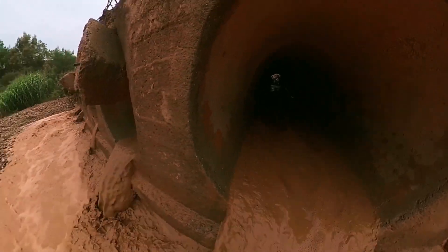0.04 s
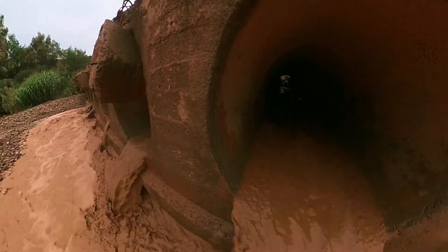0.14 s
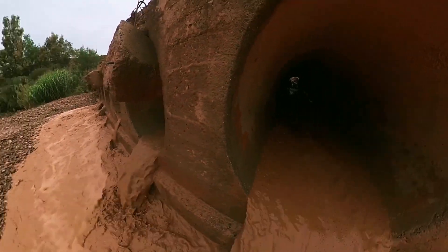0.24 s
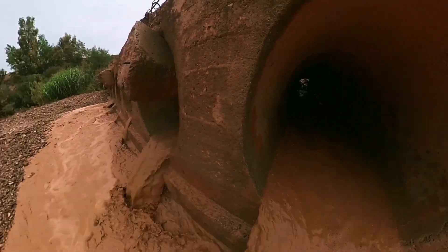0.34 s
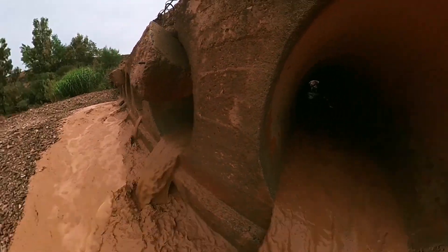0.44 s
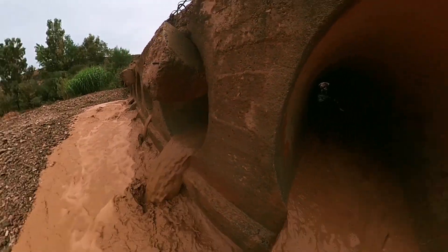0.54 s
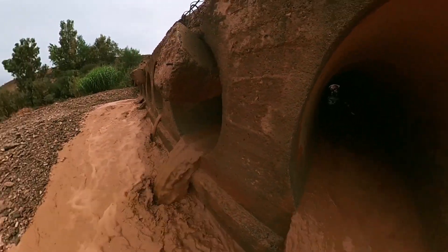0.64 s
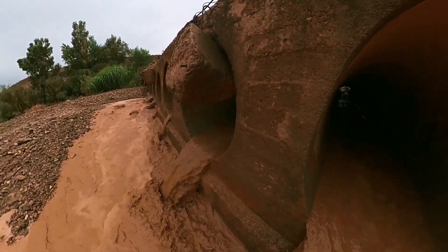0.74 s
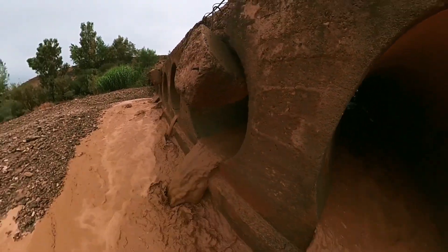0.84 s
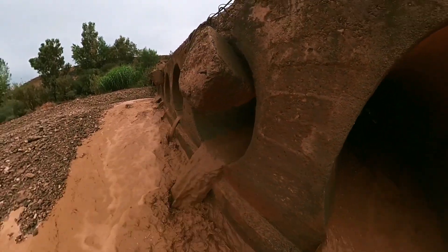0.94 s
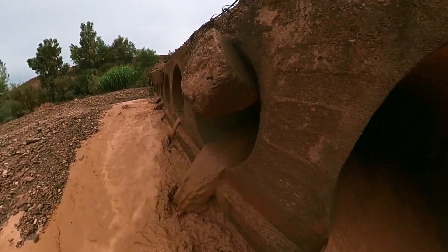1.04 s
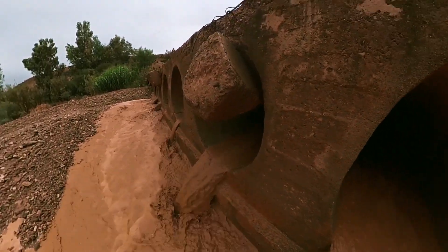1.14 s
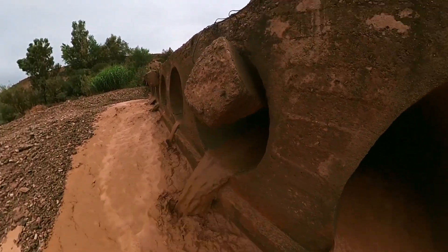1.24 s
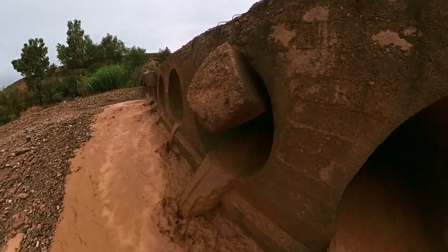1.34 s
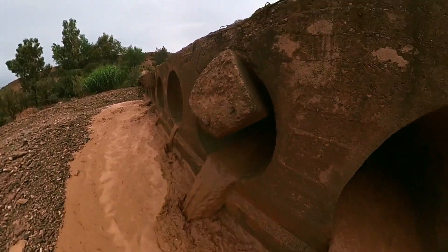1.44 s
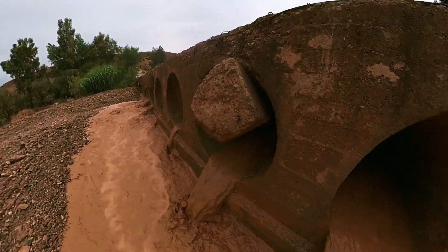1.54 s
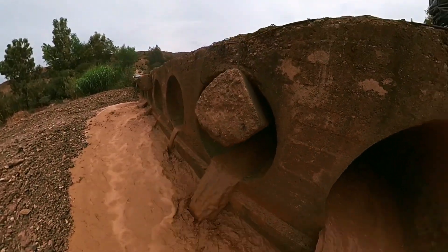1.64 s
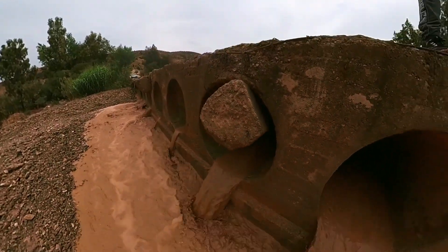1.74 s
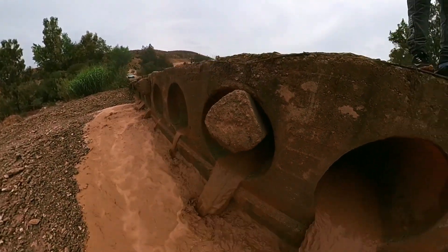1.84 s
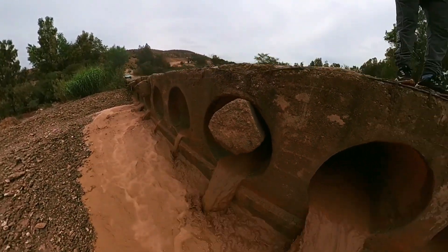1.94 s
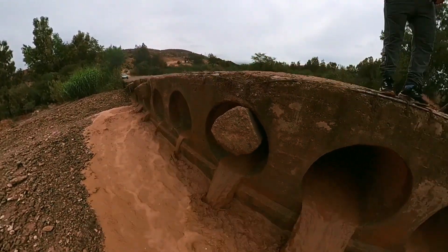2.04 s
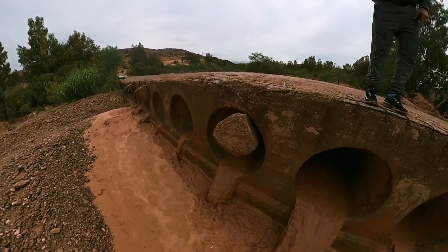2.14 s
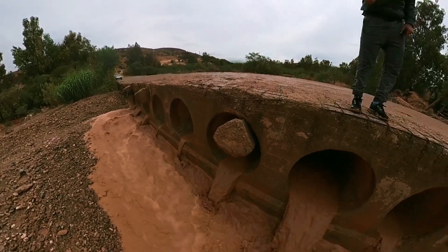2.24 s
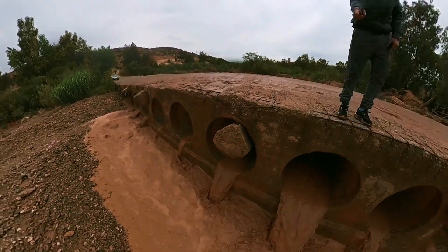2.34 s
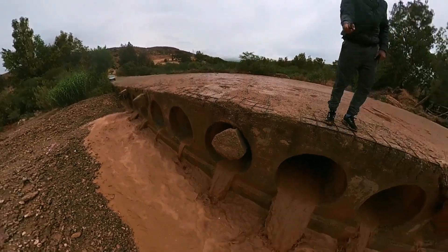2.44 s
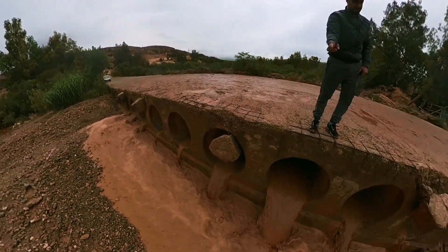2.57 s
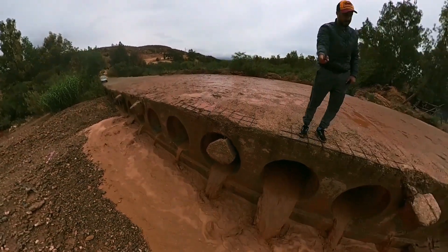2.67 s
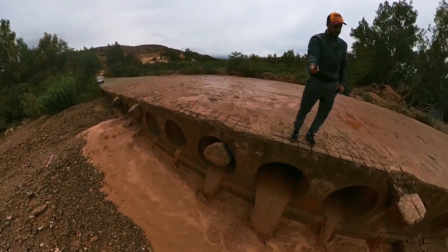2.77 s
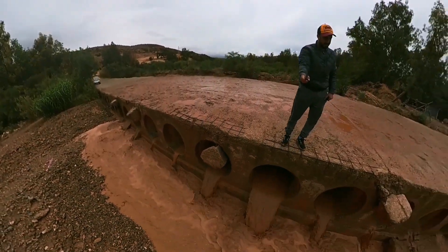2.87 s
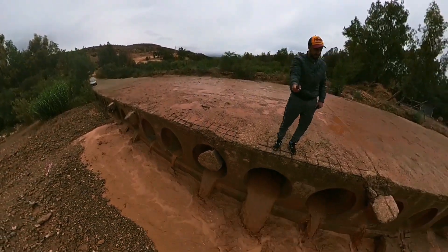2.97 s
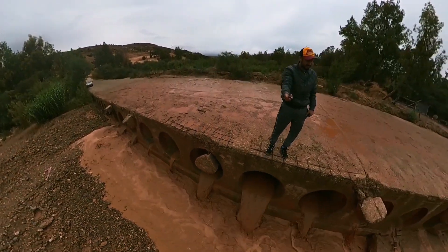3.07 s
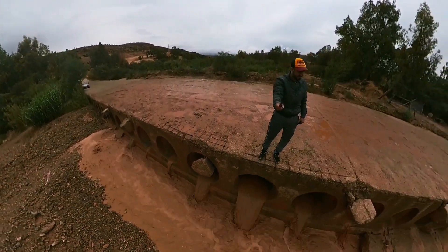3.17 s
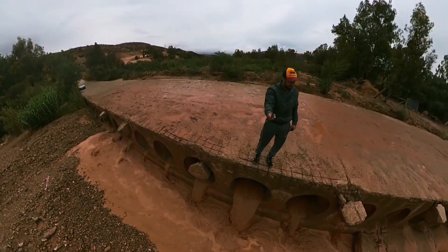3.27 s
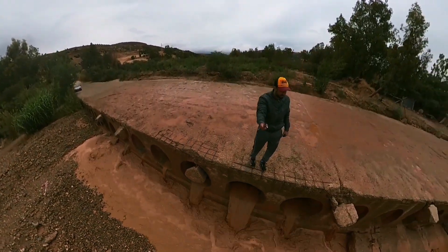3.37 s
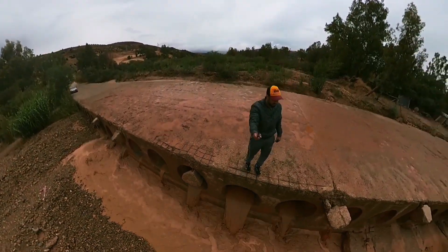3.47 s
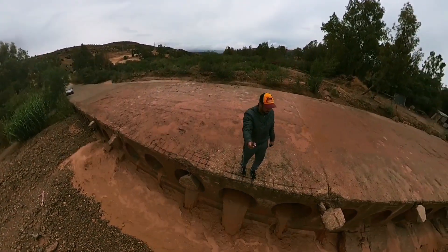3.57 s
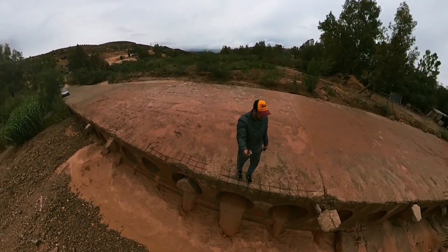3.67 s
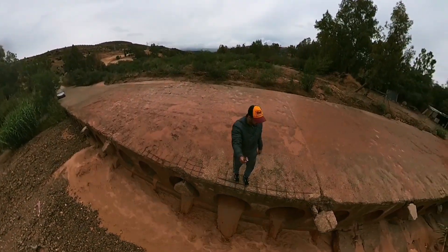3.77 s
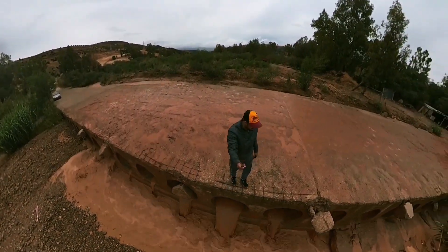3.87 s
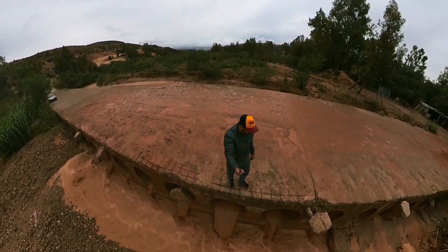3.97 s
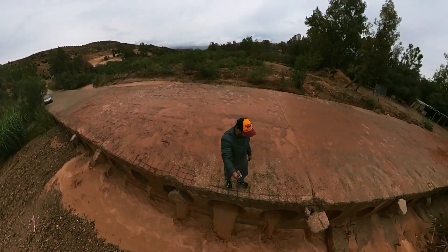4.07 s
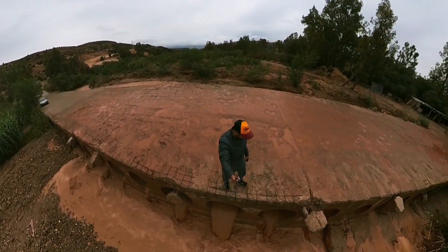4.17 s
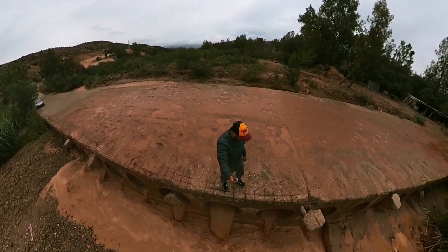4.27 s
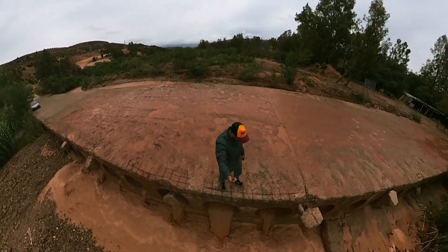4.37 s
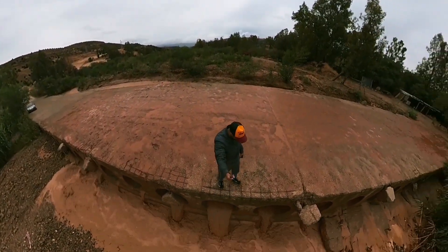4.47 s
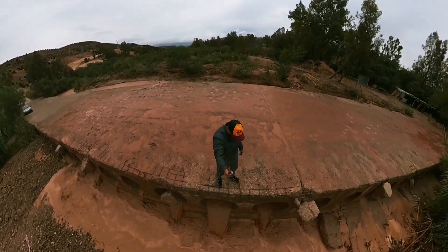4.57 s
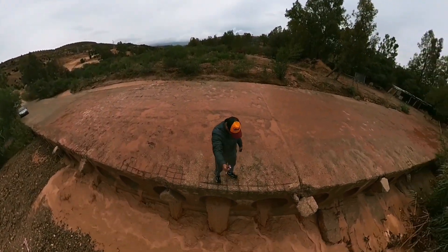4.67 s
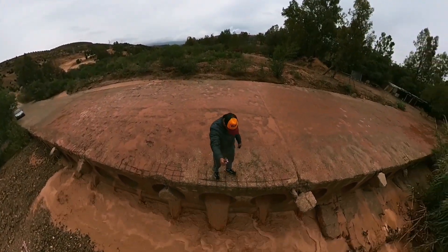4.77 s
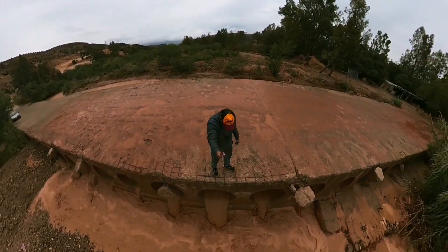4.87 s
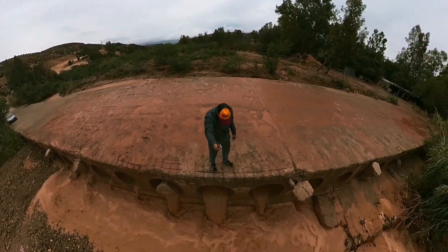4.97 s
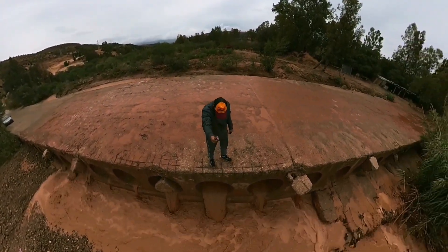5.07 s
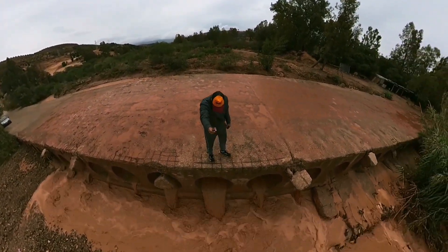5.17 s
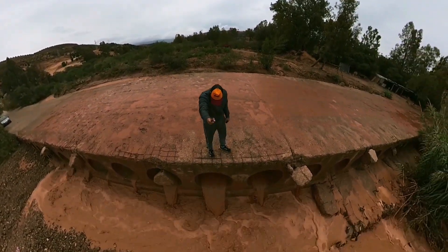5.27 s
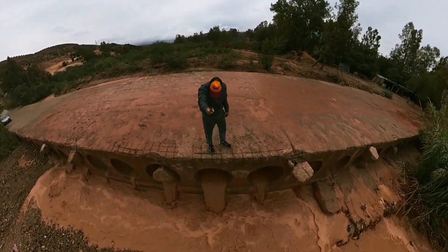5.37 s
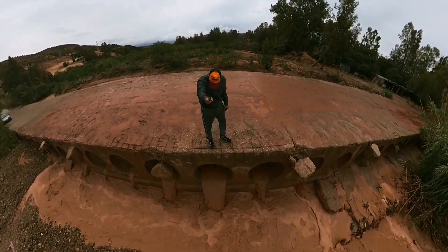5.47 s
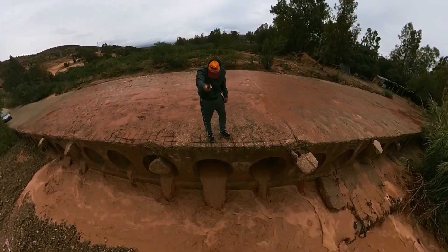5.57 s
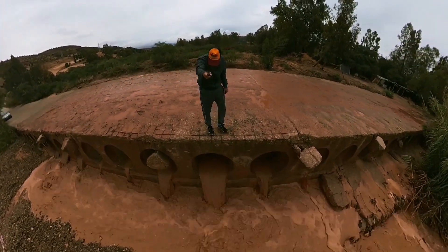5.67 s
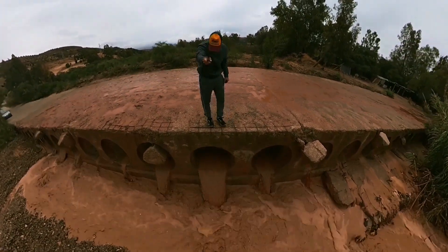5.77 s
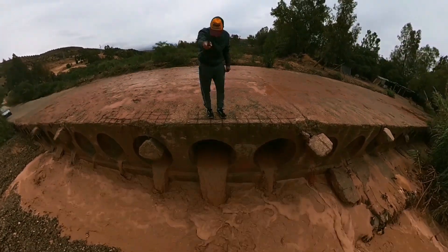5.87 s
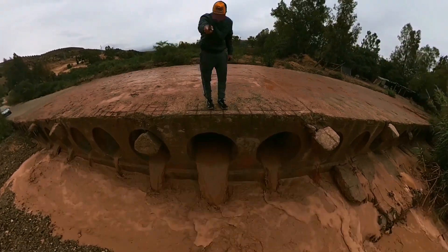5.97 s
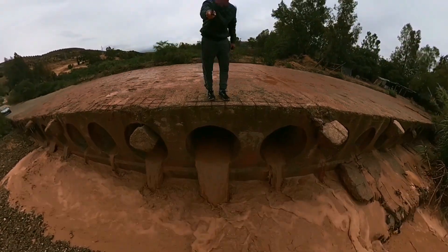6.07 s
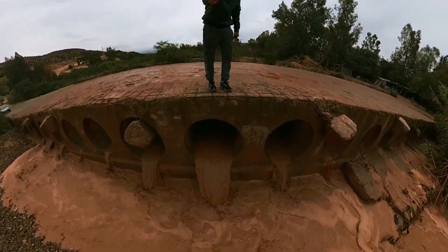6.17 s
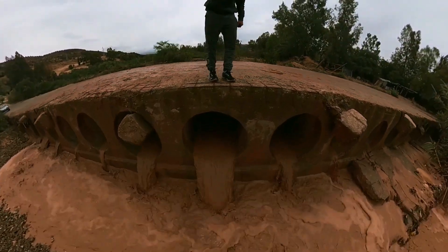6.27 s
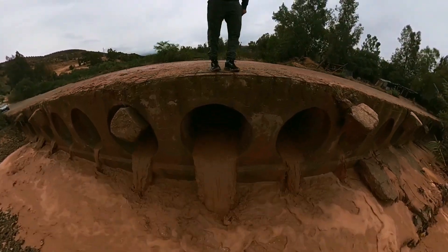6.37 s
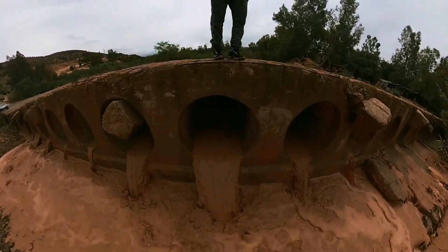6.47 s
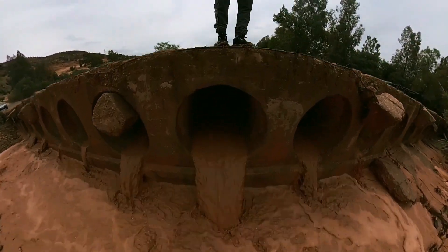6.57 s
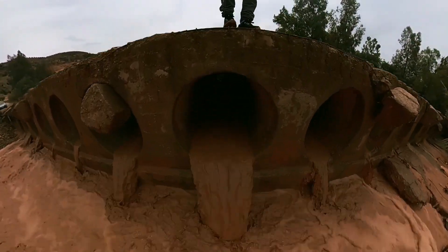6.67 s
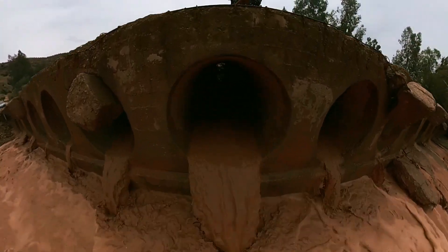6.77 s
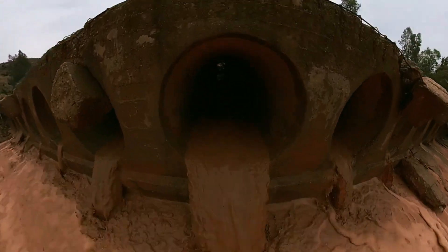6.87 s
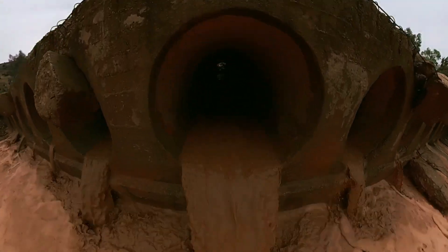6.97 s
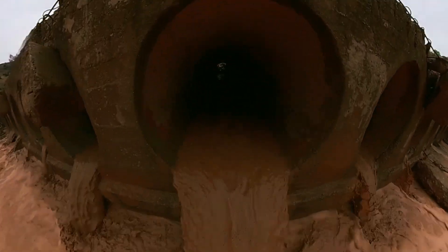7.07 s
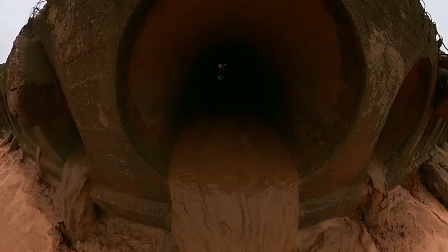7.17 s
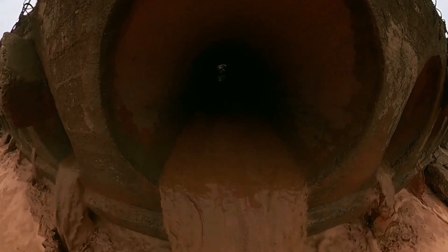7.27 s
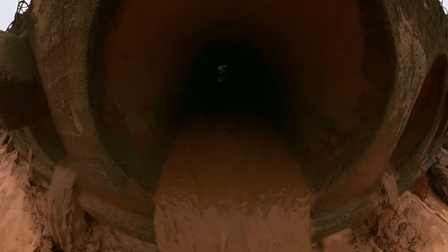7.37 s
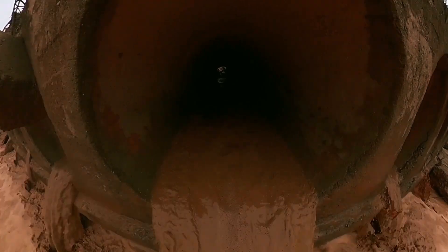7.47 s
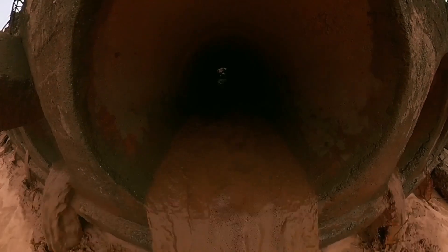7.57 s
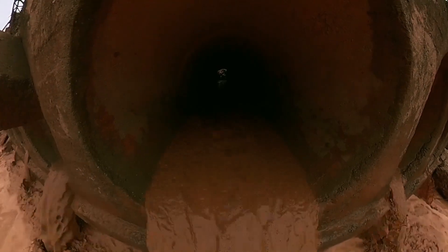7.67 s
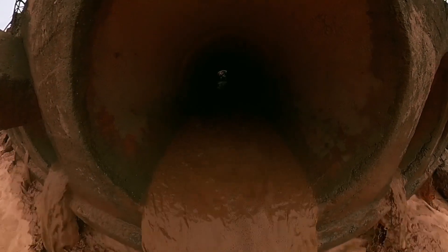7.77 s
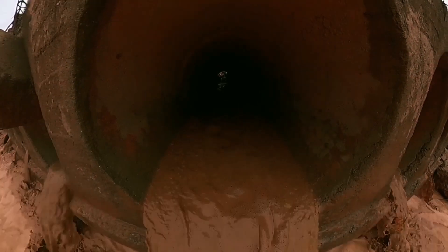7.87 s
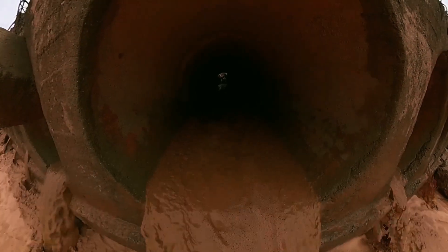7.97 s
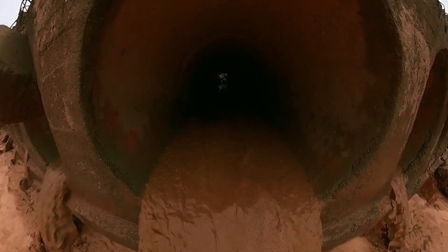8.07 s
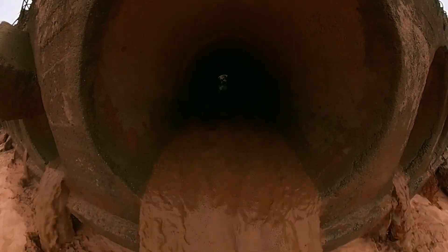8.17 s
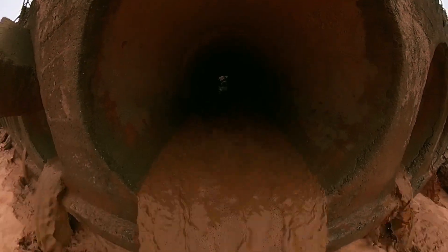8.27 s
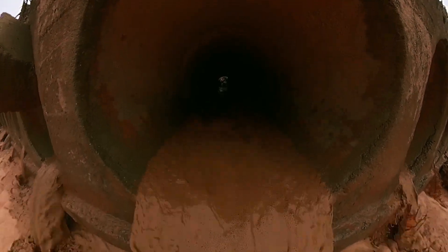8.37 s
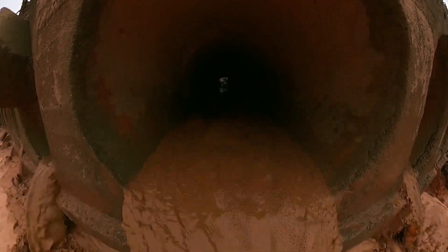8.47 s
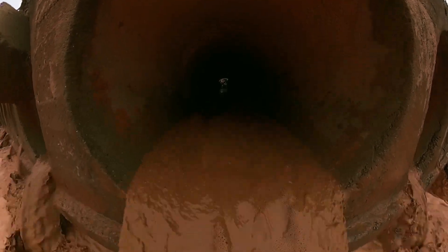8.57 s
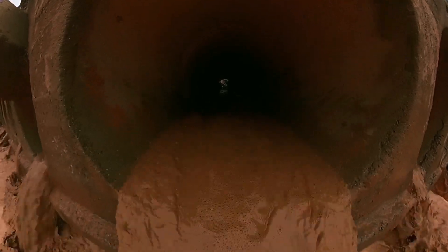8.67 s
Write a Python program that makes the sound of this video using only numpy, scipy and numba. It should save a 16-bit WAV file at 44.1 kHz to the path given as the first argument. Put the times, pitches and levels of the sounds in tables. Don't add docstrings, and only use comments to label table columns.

```python
import sys
import numpy as np
from scipy import signal
from scipy.fft import rfft, irfft, next_fast_len
from scipy.io import wavfile
from scipy.ndimage import uniform_filter1d, minimum_filter1d, map_coordinates
from numba import njit

SR = 44100
rng = np.random.default_rng(int(sys.argv[2]) if len(sys.argv) > 2 else 0)


def dump_mix(stems):
    frames = np.atleast_2d(stems).T
    limited = np.clip(frames, -1, 1)
    pcm = np.round(limited * 32767).astype(np.int16)
    wavfile.write(sys.argv[1], SR, pcm)


def makeup_ratio(level_db):
    decades = np.asarray(level_db, float) / 20
    return 10 ** decades


N = 384552


def unit(x):
    return x / np.sqrt(np.mean(x ** 2) + 1e-20)


def along(points, hz):
    f, value = np.transpose(points)
    return np.interp(np.log(hz + 1), np.log(f + 1), value)


def curve(rows):
    s, value = np.transpose(rows)
    return np.interp(np.arange(N) / SR, s, value)


def wobble(rate):
    knots = rng.standard_normal(int(N * rate / SR) + 4)
    return map_coordinates(knots, [np.arange(N) * rate / SR])


def humps(rows):
    t = np.arange(N) / SR
    return sum(db * np.exp(-((t - s) / wide) ** 2) for s, db, wide in rows)


@njit
def add(out, start, step, cycles, rise, size):
    for i in range(len(start)):
        life = cycles / step[i]
        for n in range(min(int(4 * life), len(out) - start[i])):
            u = n / life
            ring = np.sin(2 * np.pi * step[i] * n * (1 + rise * u))
            out[start[i] + n] += size[i] * u * np.exp(-2 * u) * ring


def bubbles(count, lo_hz, hi_hz, cycles, rise, spread_db):
    draw = rng.random((count, 3))
    start = (draw[:, 0] * N).astype(np.int64)
    step = (lo_hz + (hi_hz - lo_hz) * draw[:, 1]) / SR
    rarity = np.minimum(-np.log(1 - draw[:, 2]), 3.0)
    out = np.zeros(N)
    add(out, start, step, cycles, rise, makeup_ratio(spread_db * rarity) * np.sqrt(step))
    return unit(out)


# f/Hz, level/dB
SIDE_WIDTH = [(40, -10.5), (100, -26.5), (180, -30.5), (310, -26), (530, -21.5), (920, -16.5), (1580, -12),
              (2730, -6.5), (4720, -4), (6500, 0), (8500, 6.5)]


def water(spectrum, grains, share, patchy_db):
    z = signal.stft(rng.standard_normal((2, N)), nperseg=512)[2]
    patches = uniform_filter1d(rng.standard_normal(z.shape[1:]), size=8, axis=0)
    patches = unit(uniform_filter1d(patches, size=10, axis=1))
    noise = signal.istft(z * makeup_ratio(patchy_db * patches), nperseg=512)[1][:, :N]
    pair = np.sqrt(1 - share) * unit(noise) + np.sqrt(share) * grains
    m = next_fast_len(N + 8192)
    hz = np.fft.rfftfreq(m, 1 / SR)
    colour = makeup_ratio(along(spectrum, hz) + np.array([0 * hz, along(SIDE_WIDTH, hz)]))
    mid, side = irfft(rfft(pair, m) * colour, m)[:, :N]
    return np.array([mid + side, mid - side]) / np.std(mid)


# t/s, level/dB of the falls
NEARNESS = [(0, -10.5), (.55, -10.5), (1.0, -11), (1.5, -10), (2.1, -11.5), (2.6, -14), (3.15, -16.5),
            (3.65, -18), (4.3, -18), (4.95, -18.5), (5.5, -17), (6.0, -15.5), (6.5, -13), (6.9, -10.5),
            (7.5, -10.5), (8.1, -11), (8.72, -10.5)]


def nearness_db():
    return curve(NEARNESS) + 11


# t/s, share (1 inside the mouth, 0 open air)
IN_MOUTH = [
    (0, 0.91),
    (.6, 0.94),
    (1.1, 0.39),
    (1.6, 0.26),
    (2.3, 0),
    (6.4, 0),
    (7.2, 0.54),
    (7.7, 0.93),
    (8.4, 0.88),
    (8.72, 0.73),
]


def level(base_db, growth, mouth_db):
    return -11 + base_db + growth * nearness_db() + mouth_db * curve(IN_MOUTH)


# t/s, level/dB, half width/s
POOL_HEAVE = [(.25, 0, 0.23), (.57, -4, 0.071), (.88, -0.5, 0.13), (1.5, 1, 0.21), (1.999, -2, 0.15),
              (3.45, 2.5, .2), (4.6, -0.5, .2), (5.8, 1, .2), (3.0, 2, 0.13), (7.1, -1.5, 0.09),
              (8.4, -1, 0.22), (1.9, 1, 0.065)]


def heave():
    return humps(POOL_HEAVE)


# t/s, level/dB, half width/s
RIM_BOOM = [
    (1.2, 5.5, 0.35),
    (9.3, 2, 0.099),
    (3.4, 2.5, 0.18),
    (4.3, 0, 0.14),
    (0.15, -0.5, 0.12),
    (9.3, 10, 0.26),
    (7.1, 3, 0.14),
    (0.061, -4.5, 0.14),
    (8.7, 1.5, 0.071),
]


def boom():
    return humps(RIM_BOOM)


# t/s, level/dB of the swell before, level/dB of the duck after
BREAKUPS = [(.08, 3.5, 1), (0.021, 0, 4), (.24, 1, 2), (.39, -2.5, 0.5), (.77, -1.5, 0), (2.33, 2, 2),
            (2.531, -1.5, 2), (8.62, -0.5, 2.5), (0.572, 0.5, 7.5), (0.659, 3.5, -4.5), (.92, 1, 2),
            (1.089, -0.5, 3.5), (1.369, 0.5, 3), (1.54, -2.5, 4.5), (2.281, -0.5, 2), (6.857, -0.5, 2),
            (6.931, 0.5, 5), (7.12, -1, 2), (7.33, 2.5, -1.5), (7.489, -1, 5.5), (7.819, 1.5, 6),
            (8.078, 2, 5.5), (8.21, 3.5, -0.5), (8.282, -1, 2), (8.37, 4, 0.5), (8.51, 1.5, 4.5)]


def breakup_surge():
    t = np.arange(N) / SR
    rise_s, lull_s, lull_share = 0.053, 0.055, 0.39
    jets = np.zeros(N)
    for s, up_db, duck_db in BREAKUPS:
        before = up_db * np.exp(-np.abs(t - s) / rise_s)
        after = -lull_share * duck_db * np.exp(-np.abs(t - s) / lull_s)
        jets += np.where(t < s, before, after)
    depth_db = 0.36 * np.clip(1.5 + 0.1 * nearness_db(), 0, 2)
    return depth_db * (wobble(9) + wobble(30)) + uniform_filter1d(jets, size=900)


# f/Hz, level/dB per Hz
DEEP_COLOUR = [(12, -39.5), (25, -20), (45, -14.5), (70, -4.5), (100, 6.5), (160, -17), (300, -63)]


def deep_pool():
    deep = water(DEEP_COLOUR, 0, share=0, patchy_db=2.0)
    return makeup_ratio(level(base_db=-19.5, growth=1.9, mouth_db=0.45) + 1.2 * heave()) * deep


# t/s, peak level/dB, centre f/Hz, length/s
SPLASHES = [(1.119, -20, 2560, 0.027), (1.336, -15, 4260, 0.015), (1.741, -17, 2440, 0.025),
            (2.221, -11.5, 5300, 0.008), (2.464, -18.5, 3000, 0.017), (2.482, -16.5, 4900, 0.012),
            (2.409, -18.5, 4200, .012), (2.56, -18, 3800, .01), (2.562, -10, 687, 0.015),
            (2.674, -13.5, 5100, 0.008), (3.16, -12, 790, 0.012), (4.048, -20.5, 1570, 0.033),
            (4.247, -12.5, 707, 0.0088), (4.356, -13, 695, 0.013), (3.401, -20.5, 3100, .02),
            (5.044, -19.5, 3210, 0.014), (6.508, -11.5, 5300, 0.01), (6.907, -11, 2840, 0.015),
            (7.183, -6, 1300, 0.027), (8.19, -20, 2450, 0.016), (8.339, -23, 1980, 0.025)]


def splashes():
    out, t = np.zeros((2, N + SR)), np.arange(SR // 5) / SR
    for s, db, hz, length in SPLASHES:
        band = signal.butter(2, [hz / 1.2, hz * 1.15], "band", fs=SR, output="sos")
        common, own = rng.standard_normal(len(t)), rng.standard_normal((2, len(t)))
        puff = unit(signal.sosfilt(band, common + .5 * own))
        envelope = (1 - np.exp(-t / 0.0015)) * np.exp(-t / length)
        out[:, round(s * SR):][:, :len(t)] += makeup_ratio(db - 7.5) * puff * envelope
    return out[:, :N]


# t/s, f/Hz, peak level/dB, half length/s
SOFT_TONES = [(0.08, 148, -13.5, 0.06), (0.198, 440, -19.5, 0.053), (0.3, 149, -14, 0.05),
              (0.333, 313, -13, 0.04), (0.351, 543.4, -15, 0.084), (0.529, 328, -16.5, 0.068),
              (0.66, 169, -12.5, 0.02), (0.78, 463, -20, 0.063), (0.83, 152, -14, 0.055),
              (1.025, 133, -17, 0.066), (1.288, 458.4, -13, 0.068), (1.422, 286, -16.5, 0.021),
              (1.55, 163, -22, 0.049), (1.87, 166.3, -19.5, 0.066), (1.95, 494, -22.5, 0.037),
              (2.0, 154, -12, 0.04), (2.203, 145, -20.5, 0.042), (2.32, 545, -17.5, 0.045),
              (2.432, 222, -19, 0.043), (2.81, 152.8, -23.5, 0.075), (3.39, 159, -25.5, 0.043),
              (3.399, 917, -26.5, 0.042), (3.5, 866, -26.5, 0.043), (3.965, 371.6, -23.5, 0.074),
              (4.16, 229, -22, 0.035), (4.59, 218.3, -23, 0.071), (5.18, 206.6, -23.5, 0.11),
              (5.265, 1383, -32, 0.038), (5.339, 229.4, -23, 0.072), (5.61, 154, -22, 0.086),
              (5.757, 233, -16, 0.035), (6.12, 195.3, -24, 0.1), (6.157, 923, -26, 0.044),
              (6.213, 153.2, -15.5, 0.061), (6.73, 1183, -24, 0.065), (6.76, 513, -16.5, 0.055),
              (6.85, 159.2, -20, 0.079), (6.887, 414, -17.5, 0.142), (7.2, 1434, -29.5, 0.026),
              (7.24, 137, -18.5, 0.074), (7.46, 155.6, -18, 0.06), (7.607, 717, -18, 0.047),
              (7.67, 152.6, -14, 0.041), (7.781, 351, -22.5, 0.05), (7.844, 578, -13, 0.027),
              (8.01, 132.6, -14, 0.092), (8.178, 123, -16.5, 0.07), (8.369, 967, -22.5, 0.077),
              (0.601, 566, -19, .05), (1.16, 345, -16, .025), (1.225, 365, -16.5, .02),
                (1.27, 440, -15, .02), (1.26, 268, -18, .05), (1.357, 302, -18.5, .04),
                (1.069, 341, -17, .04), (1.1, 400, -16, .03), (1.43, 290, -17, .02), (1.51, 600, -17, .02),
                (0.65, 410, -17, .02), (0.96, 460, -16, .02), (7.0, 485, -18, .04),
                (7.62, 538, -16.5, 0.037), (7.717, 599, -20.5, 0.037), (8.05, 474, -17, .025),
                (8.15, 468, -15.5, 0.033), (8.211, 453, -13.5, .02), (8.341, 260, -18.5, .03),
                (8.405, 302, -17, 0.025), (8.409, 600, -14, .03), (8.468, 267, -16.5, .03),
                (8.5, 521, -16.5, 0.036), (8.648, 387, -16.5, .03)]


def swelling_tones():
    out, t = np.zeros(N), np.arange(N) / SR
    climb_per_s, trim_db = .3, -1.5
    for s, hz, db, half in SOFT_TONES:
        near = slice(max(round((s - 3 * half) * SR), 0), round((s + 3 * half) * SR))
        u = t[near] - s
        turns = hz * u * (1 + climb_per_s * u) + rng.random()
        out[near] += makeup_ratio(db + trim_db) * np.exp(-(u / half) ** 2 / 2) * np.sin(2 * np.pi * turns)
    return out


# f/Hz, level/dB per Hz
SPRAY_COLOUR = [(1500, -29.5), (2600, -5), (3200, 1.5), (4200, 4), (6000, 1), (7000, -4), (7750, -10.5),
                (7980, -17), (8190, -30), (8310, -15), (8520, -20), (8700, -32), (8950, -56), (9300, -120)]


def spray(surge):
    fizz = [bubbles(20000, lo_hz=2135, hi_hz=8944, cycles=9.0, rise=0.045, spread_db=1.5) for _ in range(2)]
    hiss = water(SPRAY_COLOUR, np.array(fizz), share=.15, patchy_db=1.2)
    return makeup_ratio(level(base_db=-17.5, growth=0.98, mouth_db=-1.3) + 1.1 * surge + 0.12 * wobble(24)) * hiss


# f/Hz, level/dB per Hz
GURGLE_COLOUR = [(400, -35), (750, 0.5), (1000, -3), (1400, -5.5), (2000, -9.5), (2900, -14), (3300, -20.5),
                 (5000, -51.5)]


def gurgle(surge):
    small = [bubbles(14000, lo_hz=584.6, hi_hz=3612, cycles=6.05, rise=0.0855, spread_db=-2.0) for _ in range(2)]
    babble = water(GURGLE_COLOUR, np.array(small), share=0.07, patchy_db=0.5)
    return makeup_ratio(level(base_db=-9.5, growth=0.88, mouth_db=2.13) + surge) * babble


# f/Hz, level/dB per Hz
PIPE_COLOUR = [(200, -43), (290, -2), (340, -2.5), (400, 1), (470, -2), (540, -6.5), (750, -48)]


def pipe():
    glug = bubbles(2500, lo_hz=220.6, hi_hz=652.0, cycles=11.0, rise=.04, spread_db=3.0)
    hollow = water(PIPE_COLOUR, np.array([glug, glug[::-1]]), share=0.16, patchy_db=1.0)
    return makeup_ratio(level(base_db=-9, growth=1.1, mouth_db=-0.32) + boom()) * hollow


# f/Hz, level/dB per Hz
POOL_COLOUR = [(50, -61), (85, -24), (115, -6), (150, 0.5), (190, 0), (260, -4), (400, -29), (700, -65.5)]


def pool_rumble():
    rumble = water(POOL_COLOUR, 0, share=0, patchy_db=0.17)
    return makeup_ratio(level(base_db=-6, growth=0.99, mouth_db=-0.85) + heave()) * rumble


# f/Hz, level/dB per Hz
ROAR_COLOUR = [(100, -45.5), (200, -8.5), (300, -1.5), (400, -1), (490, -0.5), (650, -2), (850, -9),
               (1200, -17.5), (2500, -55)]


def jet_roar(surge):
    big = bubbles(9000, lo_hz=199.9, hi_hz=1300, cycles=5.28, rise=0.053, spread_db=0.5)
    roar = water(ROAR_COLOUR, np.array([big, big[::-1]]), share=0.17, patchy_db=-1.0)
    return makeup_ratio(level(base_db=-3.5, growth=0.89, mouth_db=0.99) - 0.2 * boom() + 0.17 * surge) * roar


def scene():
    surge = breakup_surge()
    background = deep_pool() + splashes() + swelling_tones()
    return background + spray(surge) + gurgle(surge) + pipe() + pool_rumble() + jet_roar(surge)


def roll_off(x):
    return signal.sosfilt(signal.butter(12, 20000, fs=SR, output="sos"), x)


def record(dry):
    t = np.arange(N) / SR
    duck_in_s, duck_back_s = 0.018, 0.022
    duck_db = np.zeros(N)
    for s, _, db in BREAKUPS:
        duck_db += db * np.clip((t - s) / duck_in_s, 0, 1) * np.exp(-np.abs(t - s) / duck_back_s)
    ducked = dry * makeup_ratio(-duck_db)
    need = np.minimum(1, 0.95 / (np.abs(ducked).max(axis=0) + 1e-9))
    gain = uniform_filter1d(minimum_filter1d(need, size=400), size=300)
    return roll_off(ducked * gain)


dry = scene()
out = record(dry)
dump_mix(out)
```